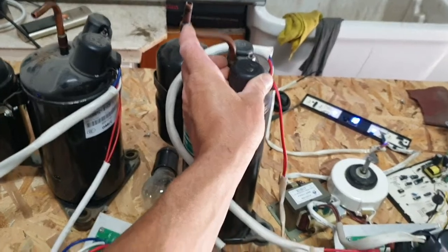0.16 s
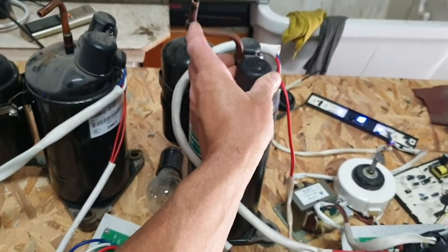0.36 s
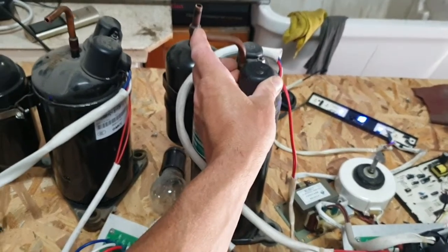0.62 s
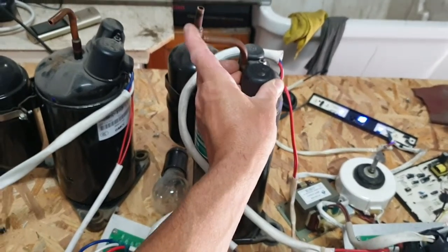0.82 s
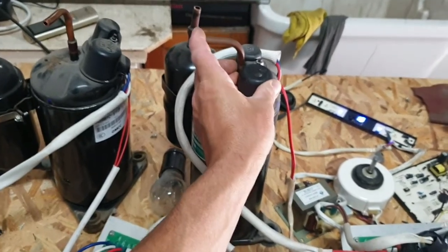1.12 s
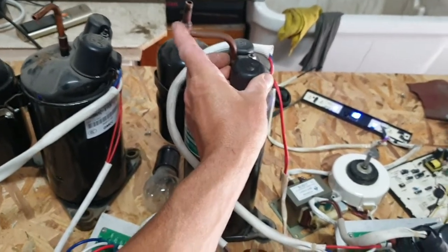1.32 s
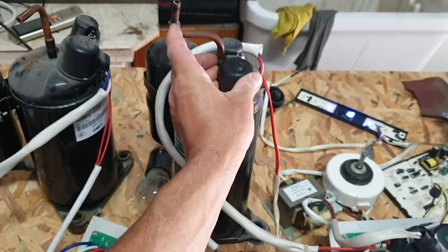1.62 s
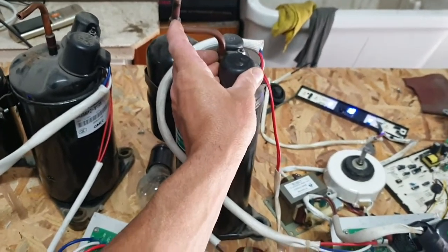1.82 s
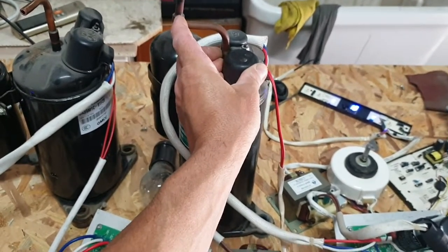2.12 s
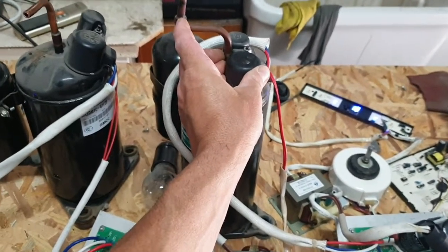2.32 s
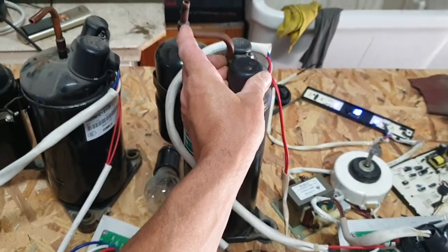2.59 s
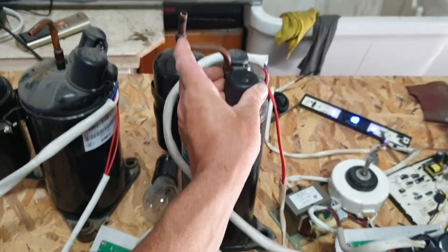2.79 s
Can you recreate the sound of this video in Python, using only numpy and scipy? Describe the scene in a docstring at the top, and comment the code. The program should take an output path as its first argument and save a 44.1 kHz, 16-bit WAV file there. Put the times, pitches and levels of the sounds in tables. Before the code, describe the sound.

A small rotary compressor buzzes with very fast puffs of air beside a steadily humming second motor; two short ragged hisses burst out, then the strained hum sings and swells, close in a workshop, stereo leaning left.

```python
"""A small rotary compressor puffs air from its tube once a turn, slowly gaining speed: each turn fires bursts of noise.
From the start a steady second motor hums and whines beside it, beating against it; these are stacks of sines.
A finger then stops the tube and air spits past it twice, as ragged coloured noise with thumping puffs.
Under load the strokes change colour and the shell sings in multiples of the shaft speed.
The loud hisses push the gain down; it holds, then creeps back, so the hum swells at the end."""
import sys
import numpy as np
from scipy import signal
from scipy.fft import rfft, irfft
from scipy.io import wavfile
from scipy.ndimage import uniform_filter1d, minimum_filter1d

SR = 44100
rng = np.random.default_rng(int(sys.argv[2]) if len(sys.argv) > 2 else 0)


def materialize(psi):
    """Save the field psi as 16-bit PCM at rate SR to the path in sys.argv[1].

    A 1-D psi becomes a single channel; in a 2-D psi each row is a channel.
    """
    bounded = np.clip(np.atleast_2d(psi).T, -1, 1)
    quanta = np.round(bounded * 32767).astype(np.int16)
    wavfile.write(sys.argv[1], SR, quanta)


N = 130095
TIME = np.arange(N) / SR
FREQ = np.fft.rfftfreq(N, 1 / SR)

# Shaft: speed at the start, its steady gain, the first stroke, and how far the hum trails the strokes
START_HZ, GAIN_HZ_PER_S, FIRST_STROKE_S, THUMP_LAG_S = 72.78, .494, .0056, .0036
# Stroke to stroke: rms changes of strength and timing
UNEVEN_DB, JITTER_S = 0.48, .000002
# Ring after each stroke: decay to 1/e, level beside the bursts, and the share of power that is fresh breath
RING_S = 0.068
SPIT_RING_DB, SPIT_BREATHY = -18.5, 0.27
SHELL_RING_DB, SHELL_BREATHY = -11.5, 0.41

# Valve spit over time, before the tube (start_s, open_db, loaded_db)
SPIT_LEVELS = [(0, -36, -49), (.55, -35, -63), (.82, -34, -59), (1.1, -33, -41), (1.35, -30.5, -46),
               (1.6, -54, -30), (2.15, -52, -32.5), (2.95, -67, -32.5)]
# Leak, valve snap, main puff, outflow and echo in one stroke (delay_s, decay_s, relative open_db, loaded_db)
SPIT_BURSTS = [(.0002, 0.00084, 2, -11), (.0005, 0.00059, -7, 1.5), (.0011, 0.00055, -0.5, -4.5),
               (.0022, 0.0074, -6.5, -7), (.0056, 0.005, -12.5, -5)]
# Colour of the spit with the tube open (pitch_hz, relative density_db per Hz)
SPIT_OPEN = [(1300, -32), (2000, -18), (3410, -8.5), (5800, -19), (6100, -20), (6530, 2), (6810, -2.5),
             (7130, -9), (7760, -1.5), (8100, 1), (8480, -10.5), (8610, -2), (9120, -1), (9470, -8),
             (10500, 2), (11100, -0.5), (11300, -1.5), (12900, -2.5), (13500, 1), (14500, -12.5)]
# Colour of the spit under load (pitch_hz, relative density_db per Hz)
SPIT_LOADED = [(3410, -86), (5800, -15.5), (6560, -3.5), (7440, -6), (8070, -1), (9050, -2), (9370, -5),
               (10800, 1), (12500, -5.5), (12900, -2.5), (13800, -2.5), (14500, -9.5)]
# Shell clatter over time, before the tube (start_s, open_db, loaded_db)
CLATTER_LEVELS = [(0, -42.5, -62), (.55, -45, -55), (.82, -42, -55), (1.1, -38, -44), (1.35, -62, -42),
                  (1.6, -42, -44.5), (2.15, -70, -44), (2.95, -51, -42.5)]
# Pump knocks in one stroke (delay_s, decay_s, relative open_db, loaded_db)
KNOCKS = [(.0001, .0007, -22, 2.5), (.0026, 0.00057, -3, 6), (.0066, .0008, -19, 1),
          (.0088, 0.00091, -1, -4)]
# Colour of the clatter with the tube open (pitch_hz, relative density_db per Hz)
CLATTER_OPEN = [(760, -64), (1300, -17), (1420, -8.5), (1630, 1), (1730, -6.5), (1770, -21), (2160, -10),
                (2370, -11), (2540, 3.5), (2860, -20), (3010, -15), (3160, -0.5), (3320, 3), (3890, -9.5),
                (4220, 0), (4570, -7.5), (4840, 5.5), (5120, -10), (5800, -2.5), (7540, -47), (12800, -120)]
# Colour of the clatter under load (pitch_hz, relative density_db per Hz)
CLATTER_LOADED = [(1030, -41), (1750, 5), (1790, -18), (2140, -4.5), (2180, -33), (2230, 1.5), (2380, -4.5),
                  (2610, -4), (2730, -9.5), (3040, -0.5), (3150, 4.5), (3290, 0.5), (3530, -12), (3640, 1),
                  (3770, -0.5), (4080, -2), (4580, -3), (5090, -9), (5800, -6), (7540, -73), (12800, -120)]
# Narrow resonances of the copper tube (pitch_hz, width_hz, lift_db)
TUBE_RESONANCES = [(3755, 36, 8), (4770, 23, 0), (7040, 66, 6), (8204, 106, 7), (8780, 140, 2.5),
                   (9680, 65, 2.5), (10300, 50, -0.5), (10600, 160, 2), (11730, 70, 4.5), (11940, 92, -1.5),
                   (12100, 100, -9), (12800, 39, 10.5)]

# Two spits past the finger, one list each (start_s, relative hiss_db, relative sputter_db)
JETS = [
    [(.822, -67, -59), (.83, -30.5, -43), (.854, -18.5, -32.5), (.88, -20, -41), (.935, -22.5, -48),
     (.955, -20, -38.5), (.99, -22, -39), (.999, -20.5, -32.5), (1.015, -22, -42.5), (1.045, -30, -57),
     (1.08, -52, -66)],
    [(1.333, -51, -66), (1.346, -32.5, -48), (1.368, -24.5, -39.5), (1.394, -22.5, -41.5),
     (1.425, -24.5, -41), (1.46, -27.5, -58), (1.495, -37, -60), (1.54, -45, -64)],
]
# Colour of the hiss (pitch_hz, relative density_db per Hz)
HISS_COLOUR = [(560, -47), (950, -21), (1090, -14), (1280, -19), (1370, -9.5), (1450, -29), (1530, -14),
               (1760, -9), (1970, -10.5), (2310, -8.5), (2590, -14.5), (2810, -5.5), (3410, -16.5),
               (3730, -8.5), (4380, -6), (5140, -7), (6160, -5.5), (7230, -2), (8580, -8), (9290, -3),
               (10200, -1.5), (12600, 0.5), (14500, -3.5)]
# Colour of the low sputter (pitch_hz, relative density_db per Hz)
SPUTTER_COLOUR = [(20, -8), (100, -1.5), (300, -1.5), (550, -6.5), (1000, 2), (1800, -3.5), (3500, -3),
                  (7000, -33)]
# Gusts that push on the microphones (centre_s, length_s, thump_db, sputter_db)
PUFFS = [(0.829, 0.0031, -38, -30), (0.856, 0.0089, -22.5, -27), (0.887, 0.026, -30.5, -32.5),
         (.997, 0.0052, -26.5, -20), (1.01, 0.013, -25, -31), (1.369, 0.0066, -37, -32),
         (1.386, 0.0034, -21.5, -28), (1.395, 0.0051, -30.5, -27.5)]
# Colour of the gusts' thump (pitch_hz, relative density_db per Hz)
THUMP_COLOUR = [(20, -18), (50, 8.5), (130, -3.5), (350, -4.5), (600, -16.5), (1500, -56)]
# Boosts on the jet curves, depth of the hiss's raggedness (rms), and the room tail's level and decay to 1/e
HISS_DB, SPUTTER_DB, HISS_ROUGH_DB, HISS_ROOM_DB, HISS_ROOM_S = 11, 12, 0.5, -8, 0.067
# The brief hollow in the rush of air
HOLLOW_AT_S, HOLLOW_LENGTH_S, HOLLOW_HZ, HOLLOW_WIDTH_HZ, HOLLOW_DB = 0.912, 0.047, 945, 350, -21

# Singing shell over time (start_s, level_db)
SING_LEVELS = [(0, -51.5), (.7, -73), (1.08, -50), (1.55, -46), (1.9, -43.5), (2.3, -43), (2.6, -46.5),
               (2.95, -46.5)]
# Tones of the singing shell (multiple of shaft speed, level_db relative to the curve above)
SING_ORDERS = [(10, -20), (11, -17), (12, -21), (15, -21), (21, -26), (22, 1.5), (23, -22), (28, -22),
               (31, -26), (32, -22), (42, -21), (43, -34), (44, -14), (45, -33), (49, -31), (50, -15),
               (51, -9.5), (60, -10.5)]
# Low hum of the compressor (multiple of shaft speed, level_db)
HUM_ORDERS = [(1, -43), (2, -46.5), (3, -60), (4, -61), (5, -66.5), (6, -68), (7, -68), (10, -70),
              (11, -67), (13, -65), (16, -67)]
# Hum and casing whine of the second motor (multiple of its speed, level_db)
MOTOR_ORDERS = [(1, -46.5), (2, -52.5), (4, -72.5), (5, -59.5), (11, -58.5), (21, -60.5), (22, -61),
                (23, -56), (24, -57), (25, -65.5), (26, -62), (27, -62), (28, -63), (29, -63.5), (33, -62),
                (34, -57.5), (35, -56.5), (36, -68.5), (37, -60.5), (38, -69.5), (47, -56), (48, -60.5),
                (49, -66), (50, -57.5), (51, -59), (53, -73), (58, -58), (68, -68), (69, -63.5)]
MOTOR_HZ = 69.99
WAVER_DB = 0.85  # rms wander of each higher tone
# Mains hum (pitch_hz, level_db)
MAINS = [(50, -55.5), (100, -64.5), (200, -61)]
# Colour of the low rumble (pitch_hz, relative density_db per Hz)
RUMBLE_COLOUR = [(20, -22), (40, -7), (55, -4.5), (90, -5), (160, -5.5), (300, -11.5), (420, -15.5),
                 (560, -18), (660, -23), (780, -12.5), (950, -17), (1050, -22.5), (1170, -15.5),
                 (1300, -28.5), (1550, -16), (2000, -14.5), (4000, -20.5)]
RUMBLE_DB = -44.5

# Left over right microphone for machine noise (pitch_hz, lean_db)
LEAN = [(60, 7), (180, 3.5), (400, -1.5), (750, 11.5), (950, 2), (1170, 10.5), (1500, 4.5), (2200, 5.5),
        (3500, 4.5), (5500, 0.5), (7000, 9), (9000, 8.5), (11000, 9), (14500, 8)]
# Left over right microphone for escaping air (pitch_hz, lean_db)
JET_LEAN = [(60, 6), (120, 8.3), (240, 9.1), (480, 14.6), (950, 9.5), (1890, 5.6), (3770, 4.7), (7520, 4.9),
            (15000, 6.2)]
# How alike the two microphones hear noise (pitch_hz, likeness from -1 to 1)
ALIKE = [(50, 0.69), (150, 0.18), (300, 0.28), (500, 0.31), (1000, 0.26), (3000, -0.031), (5000, -0.24),
         (9000, 0.024), (14000, 0.2)]
HUM_LEAN_DB, MOTOR_LEAN_DB, SING_LEAN_DB = 5, 3.5, 4.5  # left over right for tones
# Gain control threshold, hold and recovery, then the top of the band
LIMIT_DB, HOLD_S, RECOVER_DB_PER_S, EDGE_HZ = -16.5, 1.143, 6.5, 14850


def spit():
    """The valve spits air once a turn: a quick run of bursts whose colour shifts with load."""
    return strokes(SPIT_LEVELS, [SPIT_OPEN, SPIT_LOADED], SPIT_BURSTS, SPIT_RING_DB, SPIT_BREATHY)


def clatter():
    """The pump knocks the shell once a turn, and the shell rings on."""
    return strokes(CLATTER_LEVELS, [CLATTER_OPEN, CLATTER_LOADED], KNOCKS, SHELL_RING_DB, SHELL_BREATHY)


def strokes(levels, colours, bursts, ring_db, breathy):
    """Each turn fires the same bursts and ring, plus fresh breath; load changes their weights and colour."""
    clicks = stroke_clicks()
    t = TIME[:SR // 4]
    out = 0
    for state, (level_db, spectrum) in enumerate(zip(over_time(levels), colours)):  # open, then loaded
        power = amp(2 * ring_db) * np.exp(-2 * t / RING_S)
        for delay, decay, *burst_db in bursts:
            power += (t >= delay) * amp(2 * burst_db[state]) * np.exp(-2 * abs(t - delay) / decay)
        # One frozen random pattern of signs repeats every turn; the breath is new noise each time
        response = np.sqrt(power) * rng.choice([-1, 1], (2, len(t)))
        ring = unit(convolve(clicks, response))
        breath = unit(np.sqrt(abs(convolve(clicks, power))) * noise())
        mix = ring * np.sqrt(1 - breathy) + breath * np.sqrt(breathy)
        out = out + amp(level_db) * colour(mix, spectrum, LEAN)
    return out


def stroke_clicks():
    """One click a turn, slightly uneven, placed between samples by a windowed sinc."""
    turns = shaft(TIME)
    at = np.interp(np.arange(int(turns[-1])), turns, TIME)
    place = (at + JITTER_S * rng.standard_normal(len(at))) * SR
    size = amp(UNEVEN_DB * rng.standard_normal(len(at)))
    near = place.astype(int)[:, None] + np.arange(-8, 9)
    gap = near - place[:, None]
    pulse = size[:, None] * np.sinc(gap) * np.sinc(gap / 9)
    return np.bincount(near.ravel(), pulse.ravel(), N)[:N]


def shaft(t):
    """Turns of the compressor, its speed rising steadily."""
    return START_HZ * (t - FIRST_STROKE_S) + GAIN_HZ_PER_S * t ** 2 / 2


def tube(x):
    """The tube's narrow resonances colour whatever passes through it."""
    lift_db = sum(db / (1 + (2 * (FREQ - hz) / width) ** 2) for hz, width, db in TUBE_RESONANCES)
    return irfft(rfft(x) * amp(lift_db), N)


def jets():
    """Air forced past the finger: ragged hiss through the tube with a short room tail, over a low sputter."""
    hiss, sputter = np.zeros((2, 2, N))
    for curve in JETS:
        hiss_db, sputter_db = over_time(curve)
        sounding = (TIME > curve[0][0]) & (TIME < curve[-1][0])
        ragged = unit(amp(HISS_ROUGH_DB * drift(670))) * sounding
        hiss += ragged * amp(hiss_db + HISS_DB) * tube(colour(noise(), HISS_COLOUR, JET_LEAN))
        sputter += ragged * amp(sputter_db + SPUTTER_DB) * colour(noise(), SPUTTER_COLOUR, JET_LEAN)
    t = TIME[:SR // 2]
    room = rng.standard_normal((2, len(t))) * np.exp(-t / HISS_ROOM_S)
    tail = convolve(hiss, room / np.linalg.norm(room[0]))
    return sputter + hiss + amp(HISS_ROOM_DB) * tail


def hollow(x):
    """The rush of air turns hollow for a moment as a low band dips."""
    band = irfft(rfft(x) * np.exp(-((FREQ - HOLLOW_HZ) / HOLLOW_WIDTH_HZ) ** 4), N)
    dip_db = HOLLOW_DB * np.exp(-((TIME - HOLLOW_AT_S) / HOLLOW_LENGTH_S) ** 2)
    return x - band * (1 - amp(dip_db))


def puffs():
    """Short gusts as the finger slips: a dull thump of moving air and a brighter sputter."""
    thump, sputter = np.zeros((2, N))
    for centre, length, thump_db, sputter_db in PUFFS:
        gust = np.exp(-((TIME - centre) / length) ** 2)
        thump += amp(thump_db) * gust
        sputter += amp(sputter_db) * gust
    dull = thump * colour(noise(), THUMP_COLOUR, JET_LEAN)
    return dull + sputter * colour(noise(), SPUTTER_COLOUR, JET_LEAN)


def singing_shell():
    """Under load the shell sings on multiples of the shaft speed."""
    sing = tones(shaft(TIME - THUMP_LAG_S), SING_ORDERS, SING_LEAN_DB)
    return sing * amp(over_time(SING_LEVELS)[0])


def compressor_hum():
    """The turning shaft hums on its low multiples, rising with its speed."""
    return tones(shaft(TIME - THUMP_LAG_S), HUM_ORDERS, HUM_LEAN_DB)


def second_motor():
    """A motor at constant speed hums and whines, beating against the compressor."""
    return tones(MOTOR_HZ * TIME, MOTOR_ORDERS, MOTOR_LEAN_DB)


def tones(turns, orders, lean_db):
    """Sines on multiples of a rotation; the higher ones waver and reach the microphones out of step."""
    out = np.zeros((2, N))
    knots = np.linspace(0, TIME[-1], 13)
    for k, db in orders:
        k = round(k)
        free = k > 2  # the two lowest stay steady, in a fixed phase
        start = 2 * np.pi * rng.random() * free
        waver = rng.standard_normal(len(knots)) * free
        gain = np.interp(TIME, knots, amp(db + WAVER_DB * waver))
        skew = np.array([[1], [-1]]) * np.pi / 4 * min(k / 10, 1)
        # Dividing by cos(skew) keeps the level of the two microphones' mean before the lean
        out += np.sqrt(2) * gain * np.cos(2 * np.pi * k * turns + start + skew) / np.cos(skew)
    return out * sides(lean_db)


def mains_hum():
    """Steady sines at mains frequency and its multiples."""
    hum = sum(np.sqrt(2) * amp(db) * np.sin(2 * np.pi * hz * TIME) for hz, db in MAINS)
    return hum * sides(HUM_LEAN_DB)


def rumble():
    """A low bed of steady coloured noise."""
    return amp(RUMBLE_DB) * colour(noise(), RUMBLE_COLOUR, LEAN)


def amp(db):
    """Decibels to gain."""
    return 10 ** (np.asarray(db) / 20)


def unit(x):
    """Scales to rms 1."""
    return x / np.sqrt(np.mean(x ** 2) + 1e-20)


def noise():
    """Two unrelated channels of white noise."""
    return rng.standard_normal((2, N))


def sides(lean_db):
    """Left and right gains that differ by the lean."""
    return amp(np.array([[lean_db], [-lean_db]]) / 2)


def over_hz(points):
    """Reads a table along log frequency."""
    hz, value = np.transpose(points)
    return np.interp(np.log(FREQ + 1), np.log(hz + 1), value)


def over_time(rows):
    """Reads every column of a curve at each sample."""
    s, *columns = np.transpose(rows)
    return [np.interp(TIME, s, c) for c in columns]


def colour(x, spectrum, lean):
    """Gives two unrelated signals a spectrum and a place between the microphones; their mean has rms 1."""
    a, b = rfft(x)
    same = np.clip(over_hz(ALIKE), -1, 1)
    side = amp(over_hz(lean) / 2)
    left = a * side
    right = (same * a + np.sqrt(1 - same ** 2) * b) / side
    out = irfft(np.array([left, right]) * amp(over_hz(spectrum)), N)
    return out / np.std(out.mean(0))


def drift(hz):
    """Random drift of rms 1, smooth above the given rate."""
    return unit(irfft(rfft(rng.standard_normal(N)) * np.exp(-(FREQ / hz) ** 2), N))


def convolve(x, response):
    """Filters each channel by its own response."""
    return signal.fftconvolve(np.atleast_2d(x), np.atleast_2d(response), axes=1)[:, :N]


def scene():
    """The running compressor, the two spits of air, the second motor and the background."""
    strokes_heard = tube(spit() + clatter())
    air = hollow(jets()) + puffs()
    machine_tones = singing_shell() + compressor_hum() + second_motor()
    return strokes_heard + air + machine_tones + mains_hum() + rumble()


def record(dry):
    """Gain control drops quickly, holds, then recovers slowly; a low-pass then limits the band."""
    level_db = 10 * np.log10(abs(uniform_filter1d((dry ** 2).mean(0), size=900)) + 1e-12)
    excess_db = np.maximum(level_db - LIMIT_DB, 0)
    # Hold: the largest excess over the time just past
    half = int(HOLD_S * SR / 2)
    held_db = -minimum_filter1d(-excess_db, 2 * half + 1, origin=half, mode="nearest")
    # Recovery: the cut may only shrink at a set rate
    fall_db = RECOVER_DB_PER_S * TIME
    cut_db = np.maximum.accumulate(held_db + fall_db) - fall_db
    cut_db = uniform_filter1d(cut_db, size=200)
    edge = signal.firwin(401, EDGE_HZ, window=("kaiser", 8), fs=SR)
    return signal.oaconvolve(dry * amp(-cut_db), edge[None], "same")


dry = scene()
out = record(dry)
materialize(out)
```